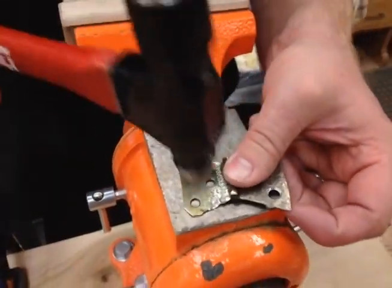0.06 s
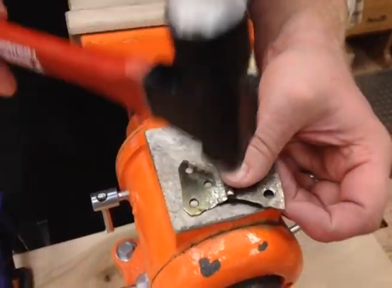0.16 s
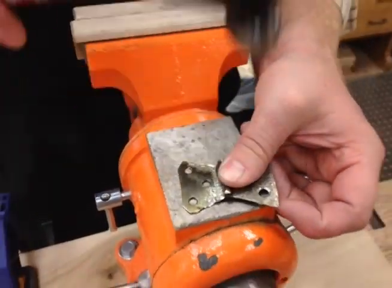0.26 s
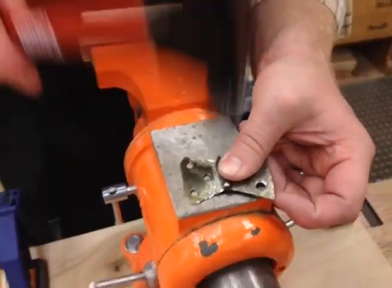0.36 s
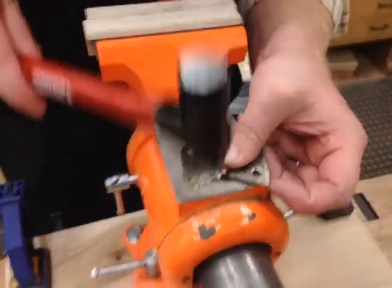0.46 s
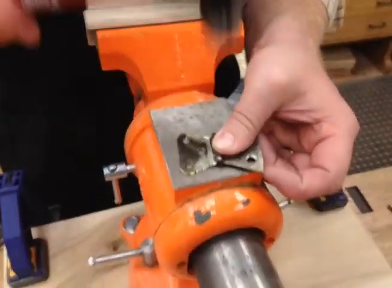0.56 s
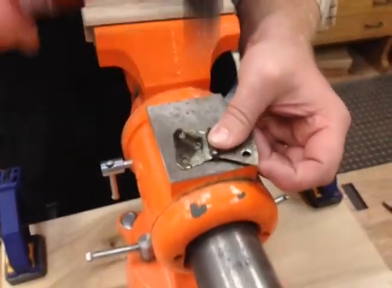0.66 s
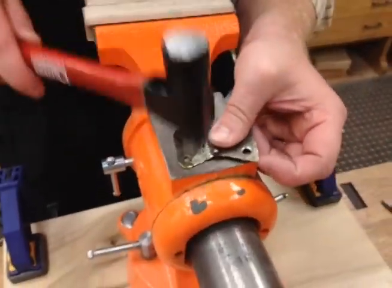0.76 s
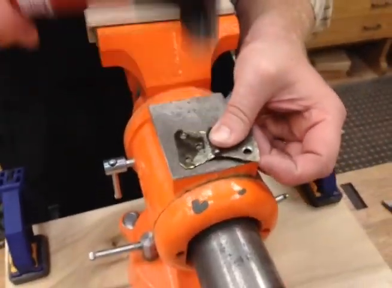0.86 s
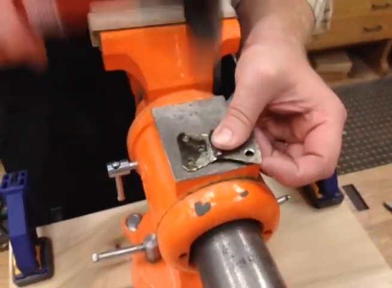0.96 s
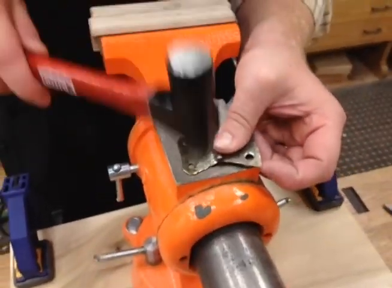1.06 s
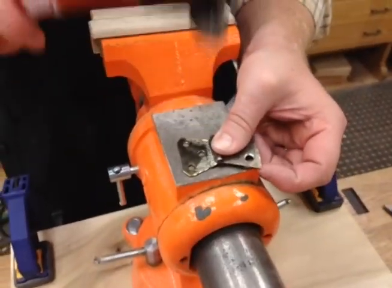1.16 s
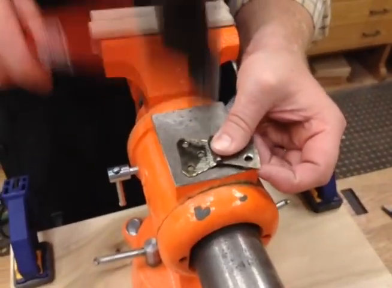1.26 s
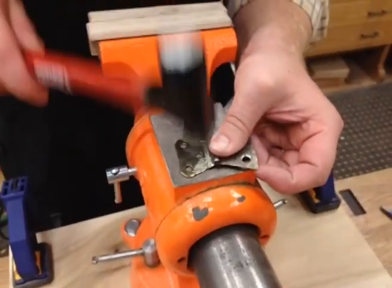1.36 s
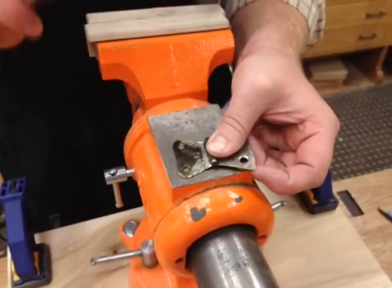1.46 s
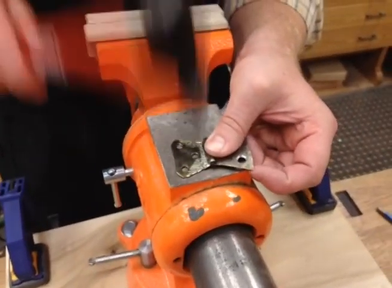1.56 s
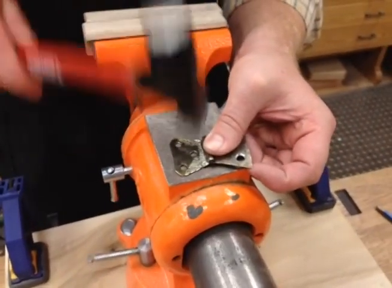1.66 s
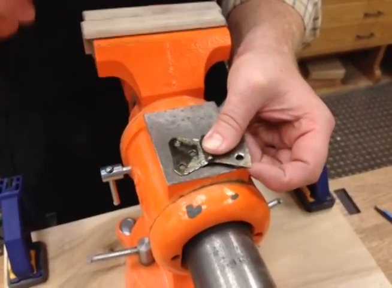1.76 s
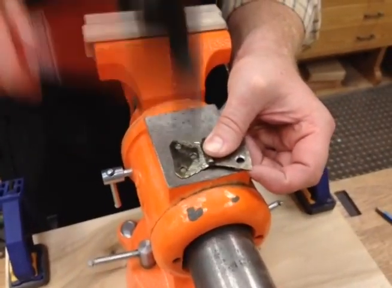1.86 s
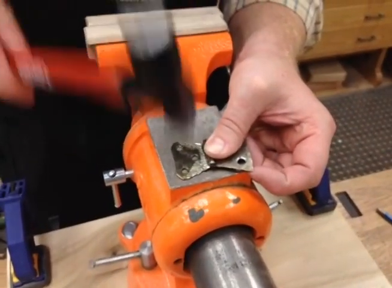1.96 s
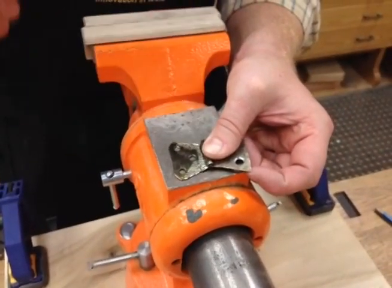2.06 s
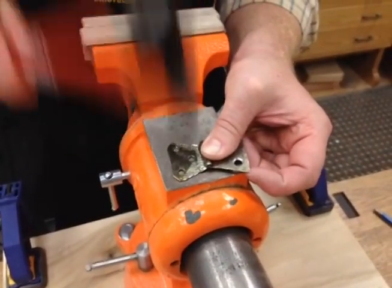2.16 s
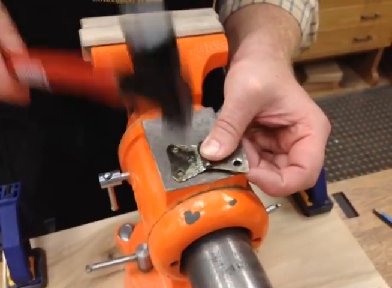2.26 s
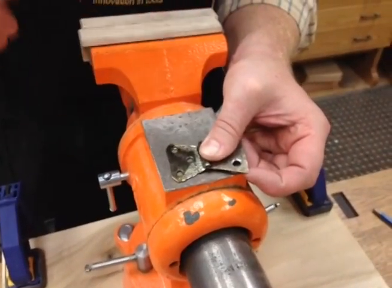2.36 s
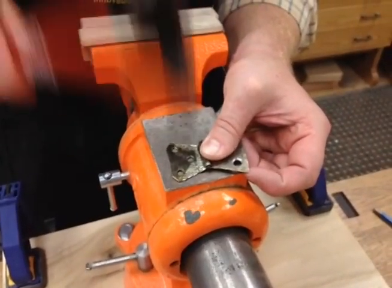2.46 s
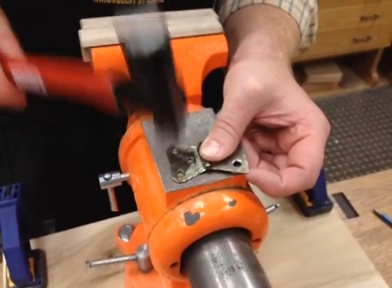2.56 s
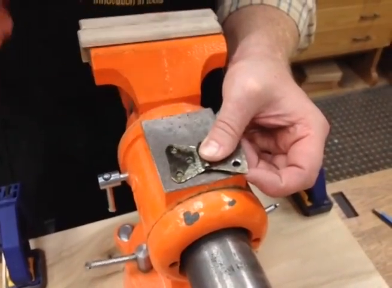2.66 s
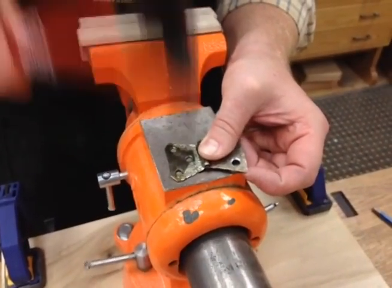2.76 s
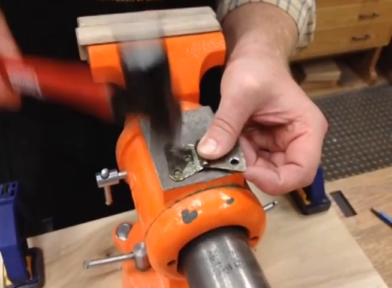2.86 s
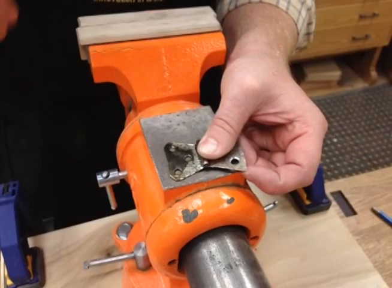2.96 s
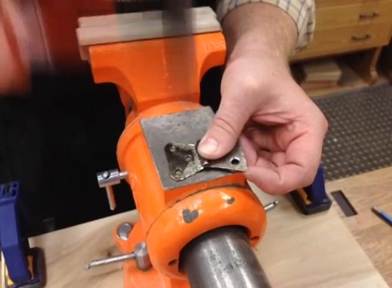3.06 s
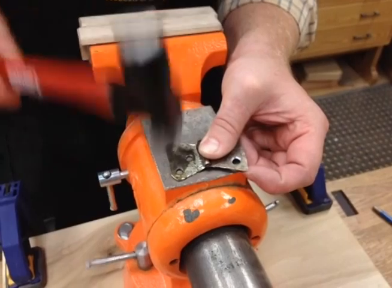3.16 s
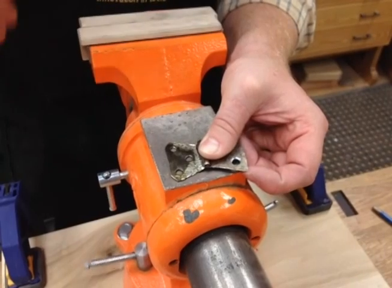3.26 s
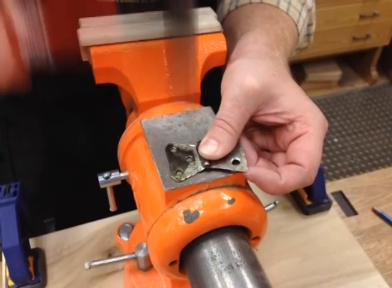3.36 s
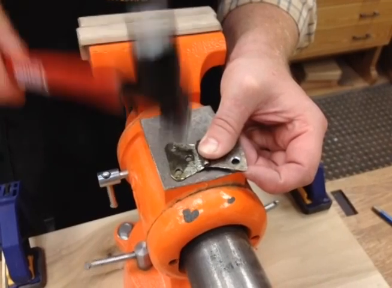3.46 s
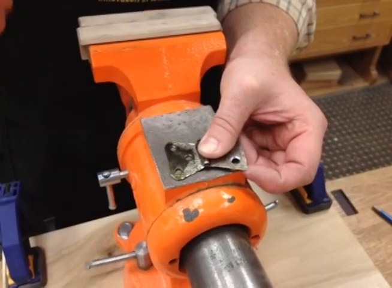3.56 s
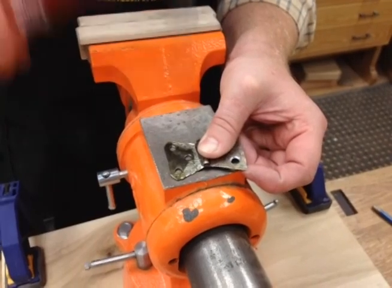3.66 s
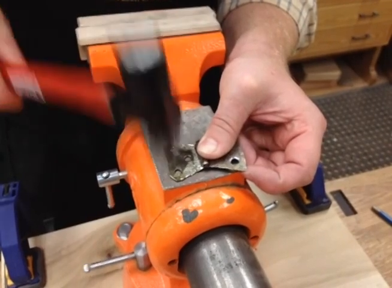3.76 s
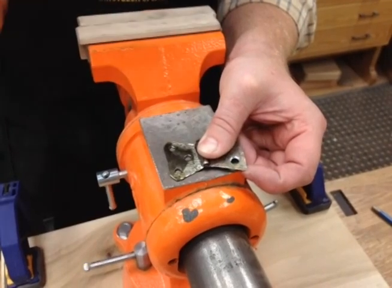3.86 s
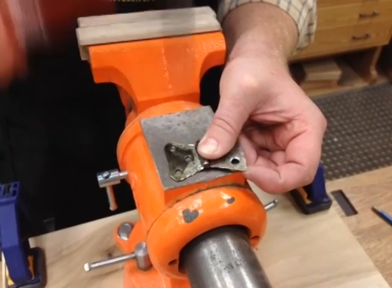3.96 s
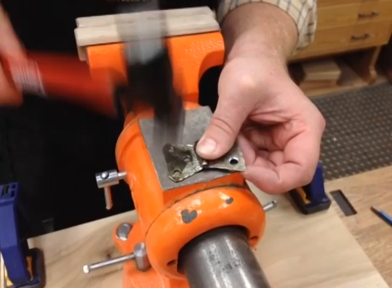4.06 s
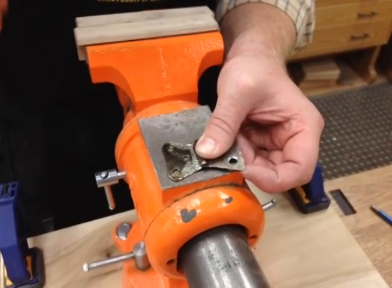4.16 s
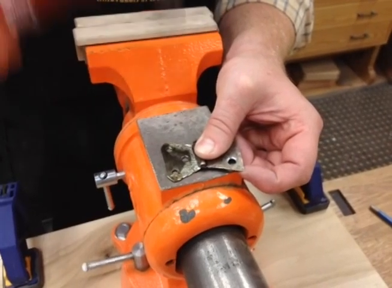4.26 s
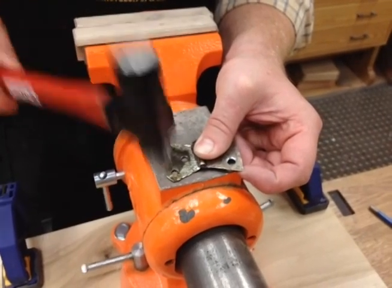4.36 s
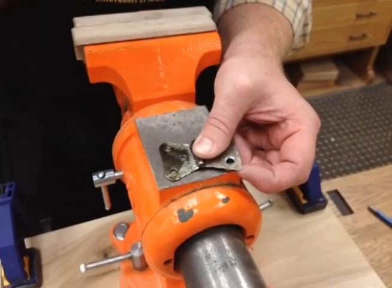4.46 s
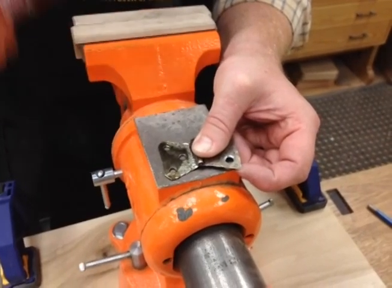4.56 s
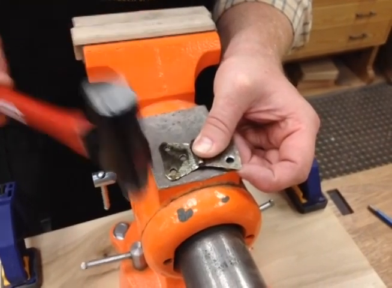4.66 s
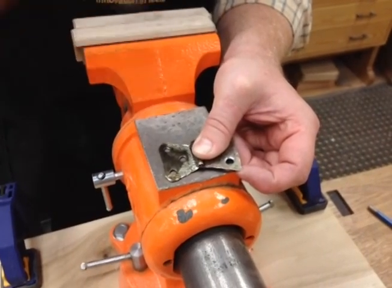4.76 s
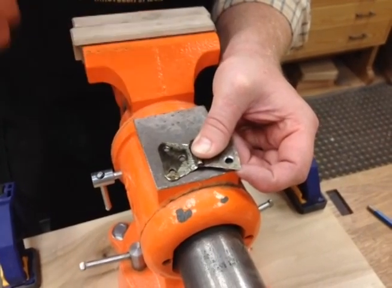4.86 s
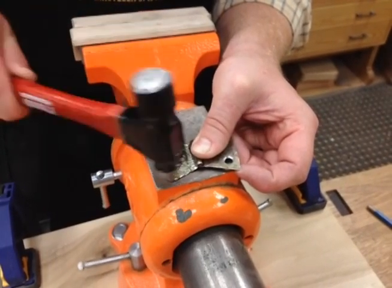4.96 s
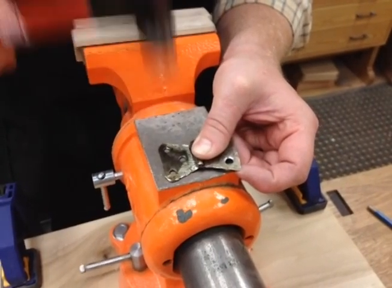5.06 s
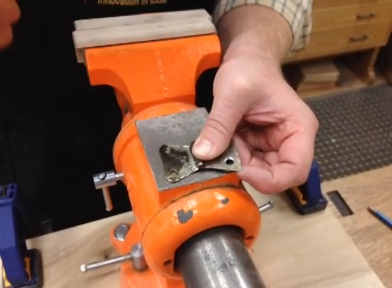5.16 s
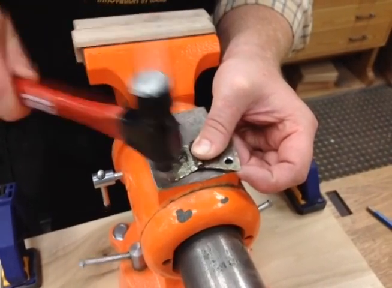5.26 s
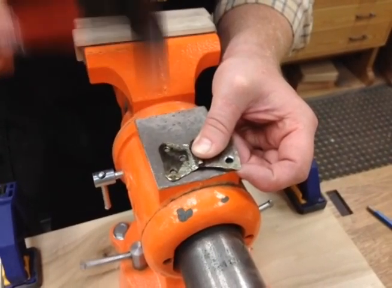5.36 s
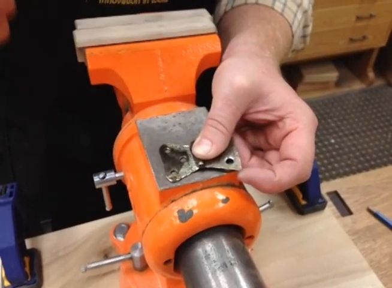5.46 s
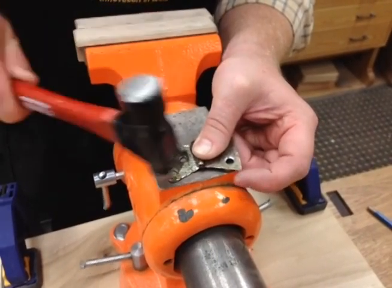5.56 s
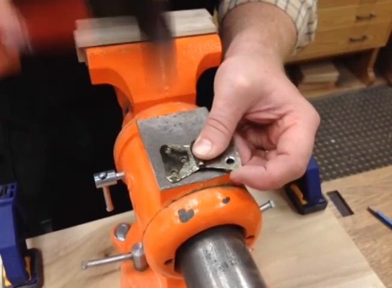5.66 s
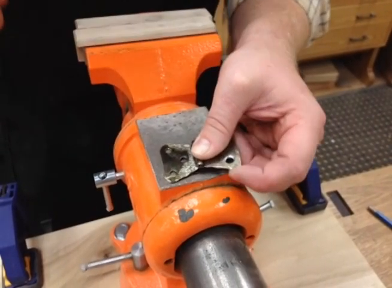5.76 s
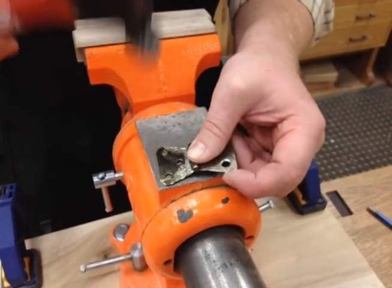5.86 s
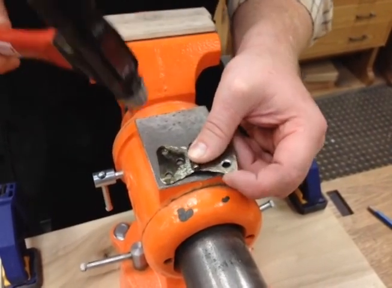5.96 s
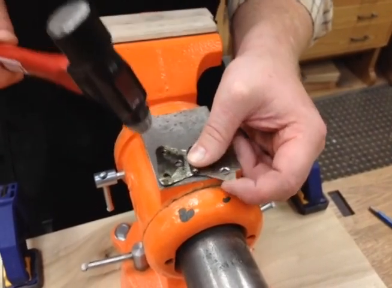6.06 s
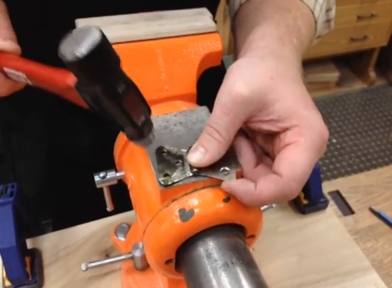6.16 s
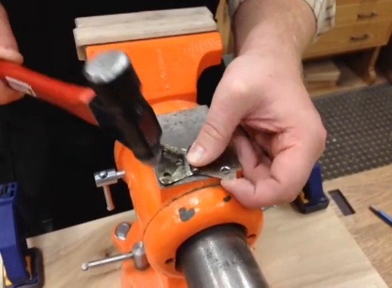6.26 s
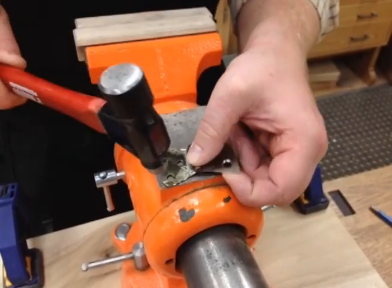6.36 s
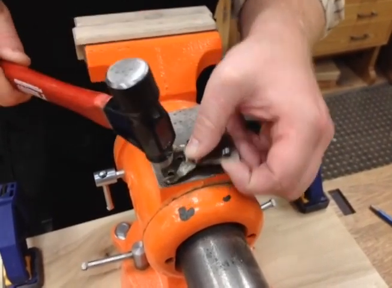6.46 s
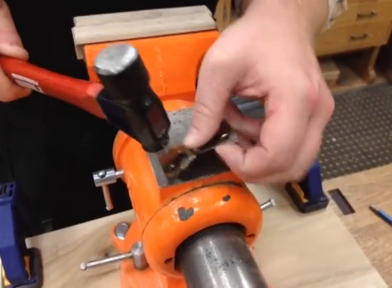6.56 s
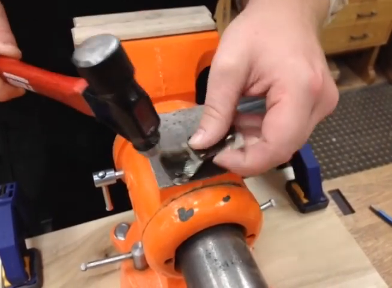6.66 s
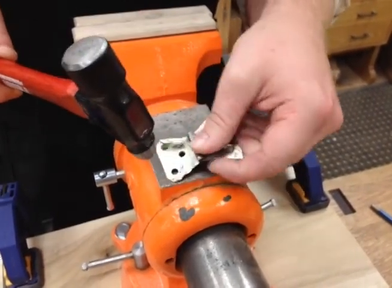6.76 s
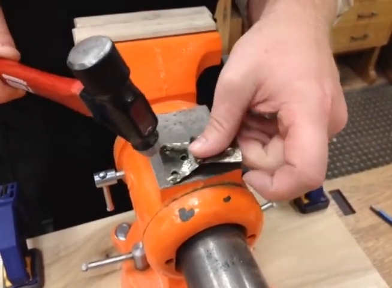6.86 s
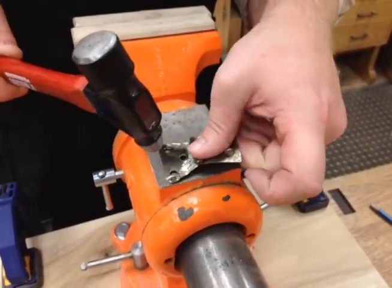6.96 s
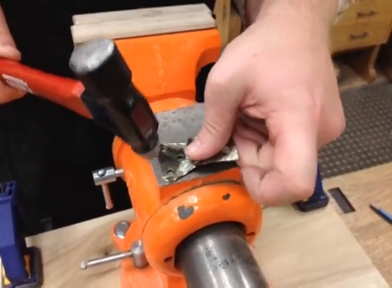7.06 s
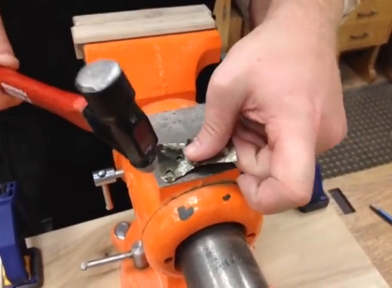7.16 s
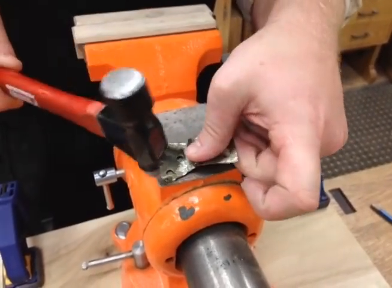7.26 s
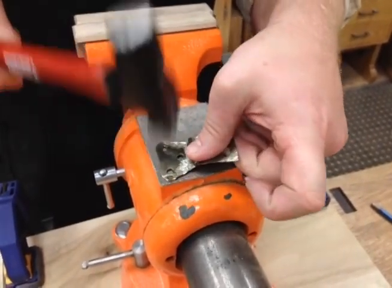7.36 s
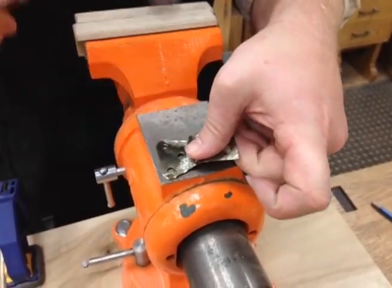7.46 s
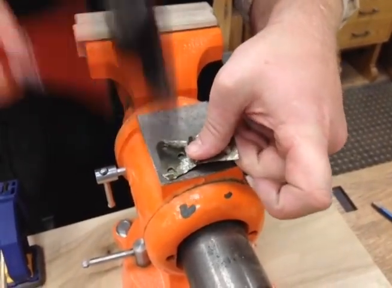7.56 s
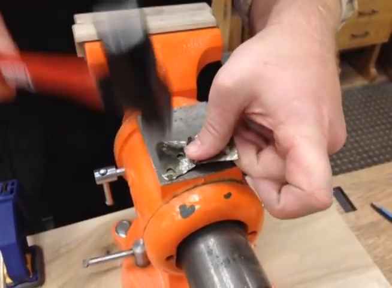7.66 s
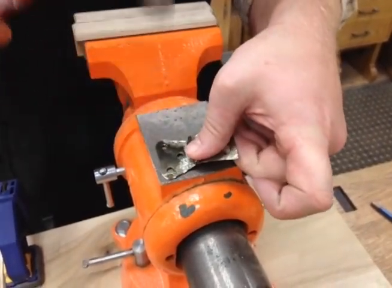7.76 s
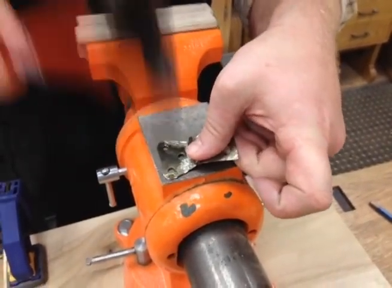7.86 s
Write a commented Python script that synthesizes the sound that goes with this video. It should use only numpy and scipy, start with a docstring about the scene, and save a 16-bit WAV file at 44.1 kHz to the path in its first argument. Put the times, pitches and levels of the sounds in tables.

```python
"""In a small workshop, a steel hammer flattens a brass hinge on the anvil of a bench vise.
A sleeve rustles faintly, then about three blows a second clank the vise, thump the bench and leave
the hammer head singing. In a pause the hinge is tapped and shifted, then one last blow falls.
A machine hums behind. The close microphone overloads, and its automatic volume control turns
the hum down after each blow."""
import sys
import numpy as np
from scipy import signal
from scipy.fft import rfft, irfft, next_fast_len
from scipy.io import wavfile
from scipy.ndimage import uniform_filter1d, map_coordinates

SR = 44100
rng = np.random.default_rng(int(sys.argv[2]) if len(sys.argv) > 2 else 0)


def waveform_to_disk(signal):
    """Save audio, clipped to [-1, 1], as 16-bit WAV at the path in sys.argv[1]."""
    frames = np.transpose(np.atleast_2d(signal))
    scaled = np.clip(frames, -1, 1) * 32767
    samples = np.round(scaled).astype(np.int16)
    wavfile.write(sys.argv[1], SR, samples)


N = 349713

# the hammer blows: (time [s], force [dB], weight of the arm behind it [dB], ring of the head [dB])
HAMMER_BLOWS = [(0.4493, -11, -6, -27.5), (.7577, 0, -16, -5), (1.0473, 0, -16, -1), (1.3314, 1.5, -12, -9),
                (1.6254, 3, -11, -3), (1.927, 3.5, 3, 6), (2.2235, 4, -7.5, 0), (2.5262, 4.5, 3.5, 1),
                (2.8267, 4.5, -1.5, 6), (3.1313, 5, -6.5, -0.5), (3.4322, 4.5, 15.5, -0.5),
                (3.7416, 5.5, 18, 0), (4.038, 5.5, 21, 4), (4.3458, 5.5, 18, 11.5), (4.6511, 0.5, -7.5, 6),
                (4.9878, 4, 18, -5.5), (5.2959, 4, 12, 6), (5.5897, 4.5, -1.5, 1), (7.6578, 1, -6, -0.5)]
# tone colour of the workshop's echo: (frequency [Hz], level [dB])
ECHO_COLOUR = [(30, -27), (80, -14), (140, 2.5), (380, 5), (560, -3), (1300, 1.5), (1950, -0.5),
               (2230, 1.5), (2550, 1), (5600, -6.5), (8200, -7.5), (9500, -17.5), (11000, -10),
               (15000, -15)]


def amp(db):
    """Turn decibels into a number to multiply a sound by."""
    return 10 ** (np.asarray(db) / 20)


def unit(x):
    """Scale a sound to an average (rms) level of 1."""
    return x / np.sqrt(np.mean(x ** 2) + 1e-20)


def along(points, hz):
    """Read between (frequency, value) points, with octaves evenly spaced."""
    frequencies, values = np.transpose(points)
    return np.interp(np.log(hz + 1), np.log(frequencies), values)


def filtered(x, response):
    """Multiply each frequency in a sound by response(hz)."""
    size = next_fast_len(len(x) + SR // 8)
    return irfft(rfft(x, size) * response(np.fft.rfftfreq(size, 1 / SR)), size)[:len(x)]


def noise(colour, size):
    """Noise of level 1, shaped by (frequency [Hz], level [dB]) points."""
    return unit(filtered(rng.standard_normal(size), lambda hz: amp(along(colour, hz))))


def fade(t, ring_time):
    """Die away by 60 dB in each ring time, given in seconds."""
    return amp(-60 * t / ring_time)


def wander(t, per_second):
    """A smooth curve through random values."""
    return map_coordinates(rng.standard_normal(64), [t * per_second], mode="mirror")


def ring(notes, t, scatter_db, detune):
    """The fading notes of a struck object, a little different in level and pitch every time."""
    out = np.zeros(len(t))
    for k, (hz, db, ring_time) in enumerate(notes):
        level = amp(db + scatter_db * rng.standard_normal())
        pitch = hz * (1 + detune * rng.standard_normal())
        out += (-1) ** k * level * fade(t, ring_time) * np.sin(2 * np.pi * pitch * t)
    return out


def add(track, start, sound):
    """Mix a sound into a track at a start time in seconds."""
    part = track[round(start * SR):][:len(sound)]
    part += sound[:len(part)]


def machine():
    """A motor and its fan run steadily across the shop."""
    # the motor's tones: (frequency [Hz], level [dB])
    motor_tones = [(118.4, -50), (236.9, -71), (296.1, -57), (349.9, -64.5), (527.6, -56.5), (812.9, -65.5)]
    # the rush of air: (frequency [Hz], level [dB])
    air_colour = [(30, -42), (70, -30), (95, -16), (120, -8), (160, -7), (300, -16), (420, -14.5),
                  (540, -12), (800, -17.5), (1300, -22.5), (2500, -26.5), (5000, -36.5), (9000, -44),
                  (15000, -46.5)]
    hum, t = np.zeros(N), np.arange(N) / SR
    for hz, db in motor_tones:
        level = amp(db + 1.2 * wander(t, per_second=5)) * np.sqrt(2)
        hum += level * np.sin(2 * np.pi * hz * t + .4 * wander(t, per_second=5))
    return amp(1.5) * hum + amp(-47) * noise(air_colour, N)


def room_tail(size):
    """The blurred echo from the walls: each frequency dies at its own speed."""
    # how long the room rings: (frequency [Hz], ring time [s])
    ring_times = [(100, 0.53), (400, 0.35), (900, 0.39), (2300, 0.44), (5000, 0.5), (8000, 0.42),
                  (14000, 0.31)]
    hz, t, spectrum = signal.stft(noise(ECHO_COLOUR, size), SR, nperseg=256)
    fading = spectrum * fade(t, along(ring_times, hz)[:, None])
    return signal.istft(fading, SR, nperseg=256)[1][:size]


def rustle_and_scrapes():
    """A sleeve rustles faintly before the first blow; later the shifting hinge makes gritty scrapes."""
    # two sleeve strokes, then the hinge's: (middle time [s], level [dB], half length [s])
    strokes = [(0.102, -60.5, 0.081), (0.427, -61, 0.067), (6.39, -61, .015), (6.648, -52, .018),
               (6.684, -40.5, 0.018)]
    # the hiss of rubbing: (frequency [Hz], level [dB])
    rub_colour = [(1500, -19.5), (4200, -11), (5300, 1.5), (7200, 2), (9000, -13.5), (12500, 1),
                  (15000, -10)]
    t = np.arange(N) / SR
    swells = sum(amp(db) * np.exp(-((t - middle) / width) ** 2) for middle, db, width in strokes)
    grit_db = 2.5 * unit(uniform_filter1d(rng.standard_normal(N), size=120))
    return swells * amp(grit_db) * noise(rub_colour, N)


def hinge_taps():
    """The loose hinge clicks on the anvil and rings briefly."""
    # light touches: (time [s], level [dB], treble lift [dB])
    taps = [(0.4495, -25.5, 15), (6.1052, -37, 12), (6.1076, -23.5, 14.5), (6.1126, -23.5, 13),
            (6.1148, -23, 5), (6.777, -26.5, -13)]
    # the click: (frequency [Hz], level [dB])
    click_colour = [(300, -15), (900, -5), (2500, -7), (4000, -6.5), (7000, -6), (12000, 3), (15500, -7)]
    # the hinge's own notes: (frequency [Hz], level [dB], ring time [s])
    brass_notes = [(3100, -7, .03), (3950, -8, .025), (4750, -8, .025), (5550, -5, .06), (6350, -2, .025),
                   (7050, -2, .025), (8450, -1, .04), (9722, -7, .09), (10780, -2, .04), (11040, -11, .24),
                   (11350, 0, .02), (11810, -8, .15), (12640, -4, .04), (13380, -3, .05), (14300, -3, .02)]
    out, t = np.zeros(N), np.arange(SR // 2) / SR
    for start, db, lift_db in taps:
        lift = lambda hz: lift_db * along([(4000, 0), (11000, 0.67)], hz)
        click = noise([(hz, level + lift(hz)) for hz, level in click_colour], len(t))
        click *= fade(t, .019) + amp(-30) * fade(t, .27)
        notes = [(hz, level + lift(hz), ring_time) for hz, level, ring_time in brass_notes]
        brass = ring(notes, t, scatter_db=1, detune=.0005)
        # a firm touch clicks more and deadens the brass
        add(out, start, amp(db) * (amp(5 + lift_db) * click + amp(-11 - .5 * lift_db) * brass))
    return out


def bench():
    """The bench takes the weight of each blow through the vise: a wooden knock and one low thump."""
    # notes of the wood: (frequency [Hz], level [dB], ring time [s])
    wood_notes = [(57, -22, 0.11), (89, -11.5, 0.26), (127.1, -11, 0.32), (174, -0.5, 0.11), (194, 0, 0.19),
                  (239, -3.5, 0.15), (280, -16, 0.45), (326, -1, 0.25), (387, 4.5, .15), (480, -9.5, .12)]
    rise_s, thump_s = .009, .0026
    out, t = np.zeros(N), np.arange(SR // 2) / SR
    thump = t / thump_s * np.exp(-t / thump_s)
    for start, _, weight_db, _ in HAMMER_BLOWS:
        knock = ring(wood_notes, t, scatter_db=1.5, detune=.025) * (1 - np.exp(-t / rise_s))
        # the knock grows slowly with the arm's weight, the thump in step with it
        add(out, start, amp(-15.5 + 0.197 * weight_db) * knock + amp(-20.5 + weight_db) * thump)
    return out


def hinge_bends():
    """The hinge's arch and kinks give way, each with one short note that hangs in the room."""
    # kinks giving way: (time [s], frequency [Hz], level [dB])
    kinks = [(0.4497, 526, -3), (0.4504, 715, 4.5), (0.4485, 2674, -3), (0.757, 1780, 0),
             (4.6516, 1770, 11), (4.9878, 2400, 4.5)]
    # every blow flattens the arch, so its hollow note rises and weakens
    arch_hz, rise_hz_per_blow, loss_db_per_blow = 1036, 25, 2.3
    arch = [(start, arch_hz + rise_hz_per_blow * k, 5.5 + force_db - loss_db_per_blow * k)
            for k, (start, force_db, *_) in enumerate(HAMMER_BLOWS)]
    out, t = np.zeros(N), np.arange(SR // 2) / SR
    for start, hz, db in arch + kinks:
        note = np.sin(2 * np.pi * hz * t) * fade(t, 0.02) * (1 - np.exp(-t / 0.0015))
        tail = room_tail(len(t))
        echo = signal.fftconvolve(note, tail / np.linalg.norm(tail))[:len(t)]
        add(out, start, amp(db) * (note + amp(-18) * echo))
    return out


def vise_shimmer():
    """Close notes of the vise beat against each other for a moment after each blow."""
    narrow_band = [(1950, -40.5), (2130, 0.5), (2320, 0), (2520, -39.5)]  # (frequency [Hz], level [dB])
    out, t = np.zeros(N), np.arange(SR // 2) / SR
    for start, force_db, *_ in HAMMER_BLOWS:
        add(out, start, amp(force_db - 29.5) * noise(narrow_band, len(t)) * fade(t, 0.48))
    return out


def steel_ring():
    """The steel rings on until the next blow stops it; a flatter hinge lets more high notes through."""
    # lasting notes of the steel: (frequency [Hz], level [dB], ring time [s])
    steel_notes = [(1140, -1.5, 1), (1392, 15, 0.39), (1704, 16, 0.35), (1691, 12.5, 0.58),
                   (2100, 6.5, .55), (2080, 9, 0.7), (2220, 14.5, 0.37), (2290, 11.5, 0.37),
                   (2320, 4, 0.76), (2900, 11, .35), (3040, 6.5, .22), (8226, -12.5, 1.3),
                   (13232, -11, 1.5)]
    out, t = np.zeros(N), np.arange(SR) / SR
    pauses = np.diff([start for start, *_ in HAMMER_BLOWS], append=np.inf)
    for k, ((start, force_db, *_), pause) in enumerate(zip(HAMMER_BLOWS, pauses)):
        treble_db = -8 + .9 * k
        notes = [(hz, db + treble_db * along([(2500, 0.082), (13000, 1)], hz), ring_time)
                 for hz, db, ring_time in steel_notes]
        ringing = ring(notes, t, scatter_db=1.5, detune=.0005)
        add(out, start, amp(force_db - 48) * ringing * (t < pause))
    return out


def hammer_head(t, free_s):
    """The head sings, wavering as it bounces, until touching the work again quiets it after free_s."""
    # the head's high notes: (frequency [Hz], level [dB])
    head_notes = [(6950, -28.5), (7060, -16), (7472, 1), (7564, -12.5), (8830, -14)]
    singing = ring([(hz, db, .3) for hz, db in head_notes], t, scatter_db=2.5, detune=.001)
    waver_db = 3 * wander(t, per_second=100)
    return singing * amp(waver_db) * fade(np.maximum(t - free_s, 0), 0.072)


def hammer_grazes():
    """The bouncing hammer chatters against the hinge, which sets the head singing again."""
    # glancing touches: (time [s], level [dB])
    grazes = [(.821, -40), (1.128, -35), (2.936, -25.5), (4.111, -34), (4.691, -33.5), (5.06, -35)]
    # the chatter: (frequency [Hz], level [dB])
    chatter_colour = [(300, -22), (1200, -8), (2000, 5), (2900, 2), (3800, -14), (7000, -19), (9000, -5),
                      (10000, -16), (14000, -10)]
    touch_s = 0.0062
    out, t = np.zeros(N), np.arange(SR // 4) / SR
    dying = fade(np.maximum(t - touch_s, 0), 0.097) * fade(t, 0.19)
    onset = 1 - np.exp(-t / 0.0016)
    for start, db in grazes:
        chatter = amp(10) * noise(chatter_colour, len(t)) * dying
        singing = amp(11) * hammer_head(t, free_s=touch_s)
        add(out, start, amp(db) * (chatter + singing) * onset)
    return out


def clank(t, force_db, grain):
    """Hinge and vise clank: a strong blow is short and hard, while the brass cushions a weak one."""
    # notes of hinge and vise together: (frequency [Hz], level [dB], ring time [s])
    vise_notes = [(209.5, -29.5, 0.16), (412, -14.5, .055), (581, -17.5, 0.049), (762, -12.5, 0.034),
                  (1086, -4.5, 0.0076), (1239, -8.5, 0.045), (1391, -3.5, 0.02), (1739, -20.5, 0.072),
                  (1910, -11, 0.019), (2150, -11, 0.06), (2293, -3.5, 0.025), (2731, -12, .03),
                  (2711, -6.5, 0.033), (2900, -4, 0.032), (3507, -4, .022), (3666, 1.5, 0.021),
                  (4140, -15, 0.026), (4810, -8, 0.023), (4890, -13, 0.026), (5085, -8, 0.025),
                  (5930, -10, 0.02), (7405, -12, 0.033)]
    # the crack, a blur of countless brief notes: (frequency [Hz], level [dB])
    crack_colour = [(30, -12.5), (200, -14.5), (1000, -12), (2300, 6), (5500, -1), (8000, -5.5),
                    (9700, -12), (11500, -8), (15000, -9)]
    # how a harder hit changes the tone: (frequency [Hz], level change [dB per dB of hardness])
    hardness_effect = [(300, 1), (700, -0.9), (1350, -1.25), (2300, -0.86), (3600, 1), (5500, 0.1),
                       (8000, 0.3), (12000, -0.47)]
    hardness_db = max(1.3 * (force_db - 4.5), -5.5)
    change_db = lambda hz: hardness_db * along(hardness_effect, hz)
    notes = [(hz, db + change_db(hz), ring_time) for hz, db, ring_time in vise_notes]
    body = ring(notes, t, scatter_db=1.2, detune=.0015) * (1 - np.exp(-(t / .0008) ** 2))
    colour = [(hz, db + change_db(hz)) for hz, db in crack_colour]
    crack = unit(filtered(grain, lambda hz: amp(along(colour, hz))))
    crack *= fade(t, 0.024) * (1 - np.exp(-t / .00025))
    return amp(6.5) * body + amp(8) * crack


def hammer_blows():
    """Every blow clanks the vise, sets the hammer head singing and echoes round the room."""
    out, t = np.zeros(N), np.arange(SR) / SR
    short_t = t[:SR // 2]

    def room_echo():
        """Echoes from nearby surfaces die quickly, those from the walls more slowly."""
        nearby = noise(ECHO_COLOUR, len(t)) * fade(t, 0.14)
        return amp(-7) * nearby + amp(-17) * room_tail(len(t))

    usual_echo, usual_grain = room_echo(), rng.standard_normal(len(short_t))
    for start, force_db, _, ring_db in HAMMER_BLOWS:
        # the vise is struck in nearly the same spot, so most of the crack's noise repeats
        grain = .8 * usual_grain + .6 * rng.standard_normal(len(short_t))
        add(out, start, amp(force_db) * clank(short_t, force_db, grain))
        # vise and walls stay put, so part of the echo repeats; the moving arms change the rest
        echo = .6 * usual_echo + .8 * room_echo()
        add(out, start, amp(force_db) * echo * (1 - np.exp(-t / 0.0036)))
        add(out, start, amp(ring_db - 18.5) * hammer_head(short_t, free_s=.042))
    return out


def scene():
    """Everything that reaches the microphone, in one channel."""
    hammering = hammer_blows() + steel_ring() + vise_shimmer() + bench() + hinge_bends()
    return (hammering + hammer_grazes() + hinge_taps() + rustle_and_scrapes() + machine())[None]


def volume_control(x, threshold_db, max_cut_db, recovery_db_per_s, attack_s):
    """A loud sound pulls the volume down quickly, and then it creeps back up."""
    level_db = 10 * np.log10(np.abs(uniform_filter1d(x ** 2, size=64)) + 1e-12)
    excess_db = np.clip(level_db - threshold_db, 0, max_cut_db)
    recovery_db = recovery_db_per_s * np.arange(N) / SR
    cut_db = np.maximum.accumulate(excess_db + recovery_db) - recovery_db
    smoothing = np.exp(-1 / (attack_s * SR))
    return x * amp(-signal.lfilter([1 - smoothing], [1, -smoothing], cut_db))


def record(dry):
    """The microphone turns loud sounds down, overloads, and loses the deepest bass and highest treble."""
    low_hz, top_hz = 30, 15400
    x = volume_control(dry[0], threshold_db=-9, max_cut_db=12.5, recovery_db_per_s=9.5, attack_s=0.0026)
    x = x / (1 + np.abs(x) ** 6) ** (1 / 6)  # the overload rounds off the peaks
    x = signal.sosfilt(signal.butter(1, low_hz, "highpass", fs=SR, output="sos"), x)
    return filtered(x, lambda hz: 1 / np.sqrt(1 + (hz / top_hz) ** 160))[None]


dry = scene()
out = record(dry)
waveform_to_disk(out)
```